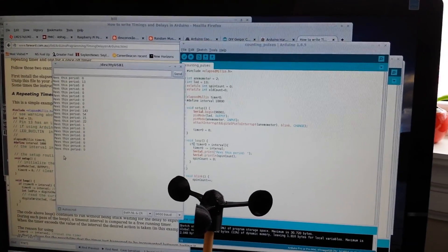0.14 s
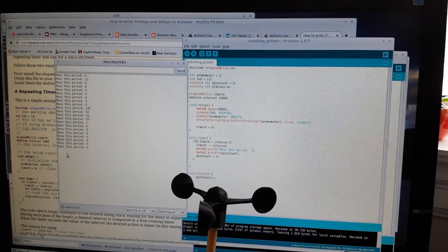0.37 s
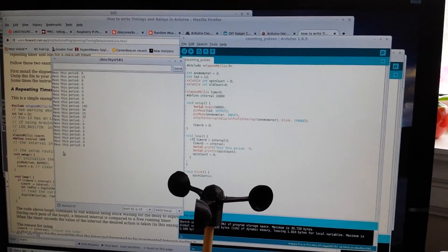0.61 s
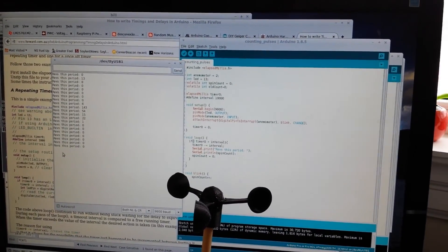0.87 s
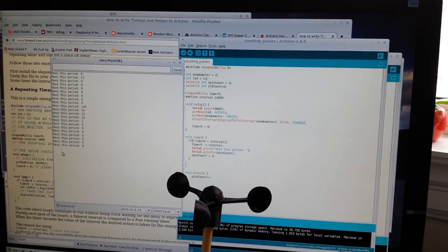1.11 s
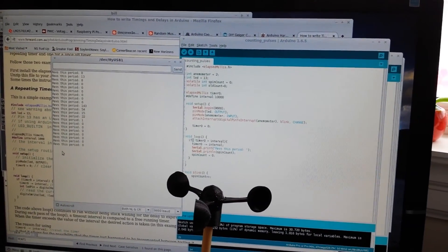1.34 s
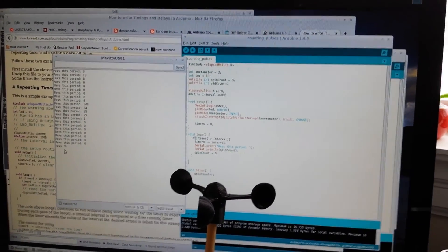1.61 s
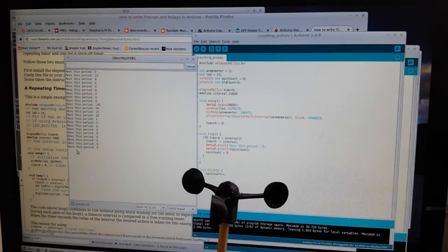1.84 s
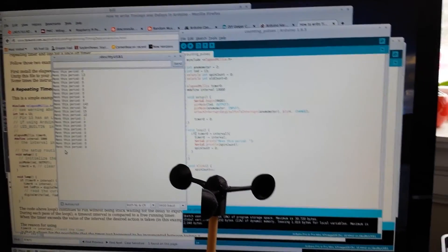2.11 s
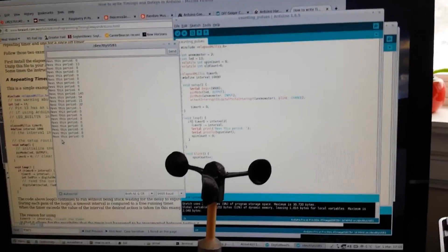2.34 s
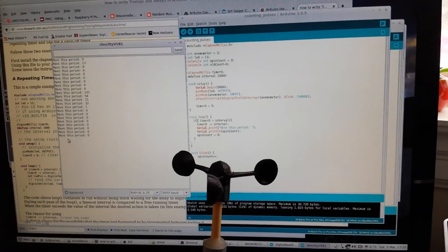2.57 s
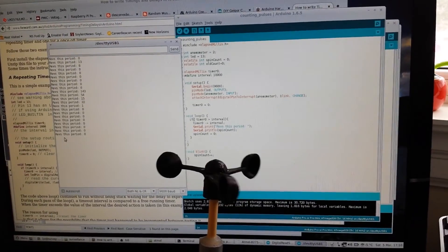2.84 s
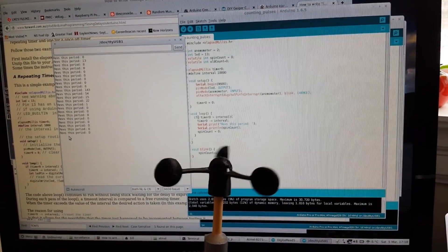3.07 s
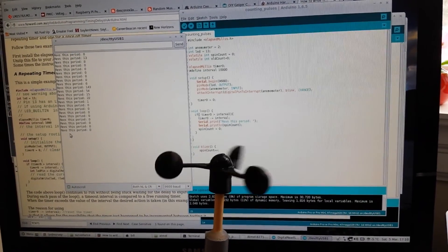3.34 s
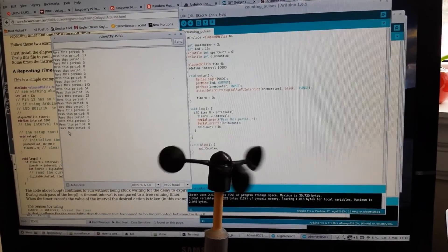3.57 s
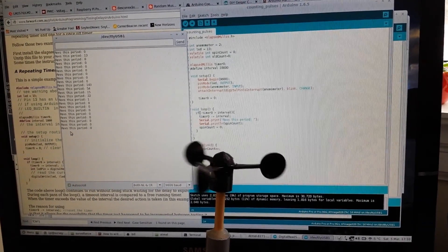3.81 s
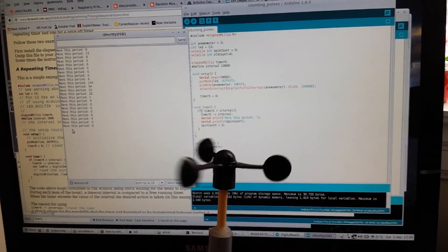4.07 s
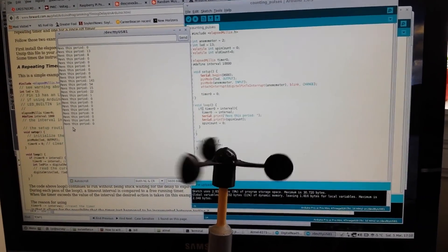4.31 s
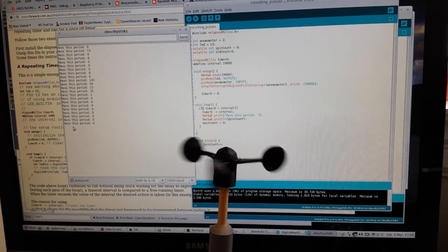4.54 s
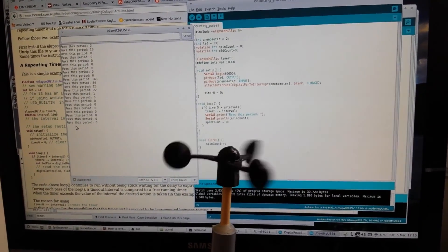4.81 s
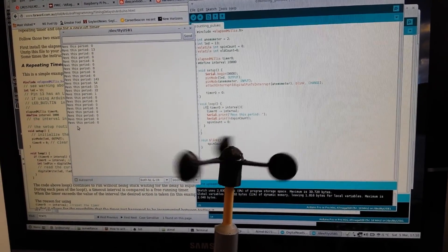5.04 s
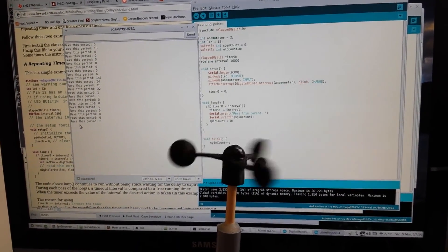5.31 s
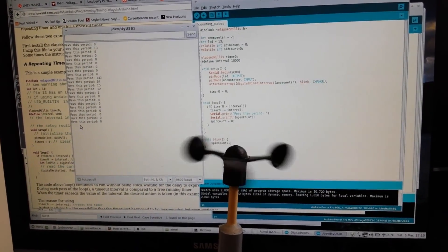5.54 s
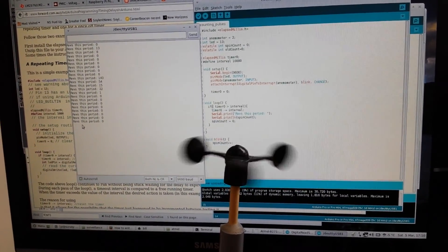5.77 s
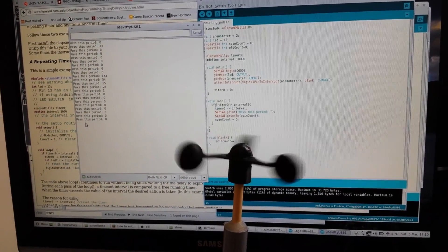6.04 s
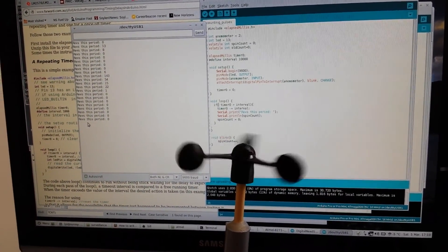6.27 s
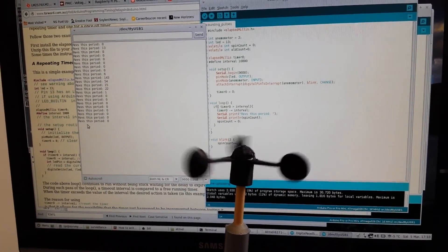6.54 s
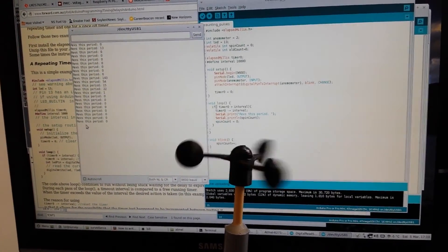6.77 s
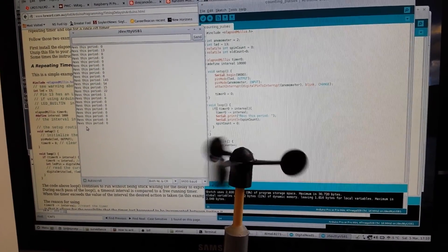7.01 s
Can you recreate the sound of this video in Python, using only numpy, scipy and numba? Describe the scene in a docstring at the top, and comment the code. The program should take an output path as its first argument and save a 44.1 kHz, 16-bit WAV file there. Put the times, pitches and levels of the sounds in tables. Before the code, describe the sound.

The first second is nearly silent: soft room hiss, settling at once, and tiny dull plastic taps around 0.1, 0.7 and 0.9 s. At 1.04 s a tight cluster of sharp switch clicks sounds, with another at about 1.28 s. A hair dryer close to the stereo microphones spins up, its whine gliding upward as air grows. Its jet sweeps across, giving a lumpy low rumble on the right near 1.45-1.6 s, then violent, distorted thumps on the left from 1.6 to 1.75 s. Until 2.5 s it runs at low speed, quieter, with a throbbing, breathy whistle. Around 2.5-2.8 s it steps up to high, pitch and rush rising; a faint handling rumble passes near 2.9 s. From 3 s to the end near 7 s the dense airy roar and buzzing motor whine stay steady, gaining a slightly more hollow, resonant colour after 5.9 s.

```python
"""Quiet room, a phone with two microphones, a hair dryer close by: it is switched on, spins up to low and is
then slid to high. Its jet, a lumpy rumble, sweeps over the right and then the left microphone on the way.
After that: rushing air (coloured noise), the whine of the shaft orders (sines at multiples of the shaft
rate), mains hum and one faint handling rumble. Switch snaps and faint taps are cracks that ring plastic;
a noise bed is the room."""
import sys
import numpy as np
from scipy import signal
from scipy.fft import rfft, irfft, next_fast_len
from scipy.io import wavfile
from numba import njit

SR = 44100
rng = np.random.default_rng(int(sys.argv[2]) if len(sys.argv) > 2 else 0)


def makeup_ratio(level_db):
    """Linear amplitude ratio for a level in decibels (20 dB per factor of ten)."""
    decades = np.asarray(level_db, float) / 20
    return 10 ** decades


def dump_mix(stems):
    """Bounce the given channels to the path in sys.argv[1] as a 16-bit WAV at rate SR."""
    frames = np.atleast_2d(stems).T  # one column per channel
    limited = np.clip(frames, -1, 1)  # hard clip at full scale
    pcm = np.round(limited * 32767).astype(np.int16)
    wavfile.write(sys.argv[1], SR, pcm)


N = 314874
T = np.arange(N) / SR
SIZE = next_fast_len(N)
F = np.maximum(np.arange(SIZE // 2 + 1) * SR / SIZE, 1)
LEFT_RIGHT = np.array([[.5], [-.5]])  # shares a left-minus-right value between the two microphones

# room tone spectrum, shape only: [f/Hz, level per Hz/dB]
ROOM_COLOUR = [(15, -38), (25, -4), (226, -2), (419, -13), (609, -8.5), (819, -16), (2000, -21.5),
               (4500, -23), (7000, -19), (9000, -22.5), (15300, -24)]
# faint room tones of fixed pitch and wavering level: [f/Hz, mean peak level/dB]
ROOM_LINES = [(120, -82), (240, -82), (1922, -92)]
# faint taps of the hand on plastic: [t/s, peak level before the room tail/dB, crack/dB, left minus right/dB]
TAPS = [(.084, -52, 8, .5), (.667, -51, -20, 3), (.918, -57, 12, 1)]
# ringing modes of the plastic: [f/Hz, level/dB, t60/s]
PLASTIC_MODES = [(600, -3, .03), (800, 0, .015), (1650, -15, .02), (2600, -20, .015)]
# switch snaps: [t/s, peak level before the room tail/dB, crack/dB, left minus right/dB]
SNAPS = [(1.04, -21, -2, 1), (1.0426, -26, 0, 1), (1.0457, -20, -2, 1), (1.0485, -26, -2, 1),
         (1.061, -34, 0, 1), (1.0648, -30, 0, 1), (1.0684, -29, -2, 1), (1.0735, -34, 0, 1),
         (1.279, -25, -4, 1)]
# ringing modes of the switch: [f/Hz, level/dB, t60/s]
SWITCH_MODES = [(850, -18, .03), (1300, -22, .015), (2300, -8, .022), (3100, -12, .007), (4200, -5, .005),
                (5200, -7, .006), (6400, 4, .008), (7200, -1, .006)]
# jet crossing the microphones; the last row is a faint low handling rumble:
# [arrival t/s, hold/s, rise/(dB/s), left level/dB, right level/dB]
RUMBLES = [(1.262, .025, 700, -38, -60), (1.3, .25, 240, -48, -56), (1.368, .03, 600, -60, -32),
           (1.445, .145, 500, -52, -23), (1.53, .04, 300, -38, -60), (1.59, .006, 1600, -16, -30),
           (1.61, .012, 1100, -5, -22), (1.634, .032, 1400, -4, -36), (1.68, .026, 1300, -8, -36),
           (1.72, .02, 500, -27, -44), (2.93, .05, 60, -46, -47)]
# spectrum of these rumbles, shape only: [f/Hz, level per Hz/dB]
RUMBLE_COLOUR = [(15, -32), (40, -5), (90, 6.5), (200, -0.5), (400, -12), (800, -28.5), (1500, -43),
                 (3000, -73)]
# shaft orders 1 upwards, one row each, at full speed and usual load: [left level/dB, right level/dB]
ORDERS = [(-50, -49), (-35, -46), (-31.5, -36), (-37, -35), (-43, -36), (-44, -52), (-47, -40), (-41, -34),
          (-39, -39), (-35, -35), (-37, -32), (-32, -35), (-39, -42), (-54, -52), (-38, -43), (-47, -47),
          (-46, -46), (-47, -47), (-52, -52), (-48, -48), (-43, -43), (-45, -45), (-42, -42)]
# the orders above those: [f/Hz, level/dB]
BRUSHES = [(5400, -45), (6800, -42), (8000, -45), (9500, -60), (10000, -55), (10240, -49), (10450, -59),
           (10700, -57), (12000, -52), (12800, -58), (13200, -60), (15000, -66)]
# orders that ring the casing as they glide through its resonances:
# [order, f/Hz, width/Hz, left level/dB, right level/dB]
GLIDES = [(12, 1070, 150, -55, -46), (8, 700, 110, -48, -50), (9, 905, 90, -48, -41),
          (3, 395, 60, -40, -48), (5, 690, 60, -38, -38), (7, 965, 80, -41, -38), (8, 1110, 60, -46, -40),
          (5, 933, 62, -37.5, -46.5)]
# phase by which the left microphone leads the right: [f/Hz, lead/rad]
LEAD = [(0, -1), (1030, 1.05), (1980, 1.5), (2240, 4), (2580, 4), (3360, 3), (4220, 2.5), (5770, 6.5),
        (8010, 8), (9040, 9.5), (12500, 15.5), (12700, 23), (14500, 14), (15000, 24)]
# rushing air as the dryer is moved: [t/s, level/dB, left minus right/dB]
AIR = [(1.09, -52.5, 5), (1.17, -47, 4.5), (1.28, -36, 3.5), (1.4, -29, 3), (1.56, -22.5, 4.5),
       (1.76, -27.5, 3.5), (1.84, -27, 3), (1.95, -29.5, 2.5), (2.14, -30.5, 1.5), (2.46, -31, -0.5),
       (2.56, -26.5, 0), (2.66, -23, 0), (2.8, -19, -0.5), (3.2, -18.5, -1), (4, -17.5, -0.1),
       (4.6, -18.5, -0.2), (5, -17.5, -1.5), (5.85, -18, -.5), (6.4, -17, -0.3), (7.14, -17.5, -0.5)]
# spectrum of the rushing air, shape only: [f/Hz, level per Hz/dB]
AIR_COLOUR = [(18, -63), (30, -40), (113, -14), (357, -12.5), (452, -8), (618, -8), (685, -5.5),
              (1190, -6.5), (1540, -1.5), (2330, -6), (2800, -8.5), (3190, -9), (3800, -6.5), (4480, -9),
              (5300, -5.5), (6980, -3), (10500, -21), (12300, -26.5), (15300, -37.5)]
# barrel resonances lifting the air: [f/Hz, width/Hz, lift/dB]
BARREL = [(763, 42, 4), (1473, 240, 3.5), (2780, 150, 6.5), (6190, 250, 5), (7040, 1070, 3.5)]
# share of the air noise common to both microphones: [f/Hz, share of power 0-1]
LIKENESS = [(40, 1), (130, 0.74), (300, 0.7), (700, 1), (1400, 1), (3000, 0.17), (6000, 0), (10000, 0.24),
            (15000, 0)]
# balance of the air across the spectrum: [f/Hz, left minus right/dB]
TILT = [(60, 19), (110, -1), (200, 7.5), (380, 5), (690, 4), (1280, 0), (2360, 0), (4350, 5.5), (8030, -4),
        (14800, -5)]
# change of colour when the fan is slow: [f/Hz, change at standstill/dB]
SLOW_COLOUR = [(150, 11), (300, 7), (1000, 19), (1450, -10), (2050, -2.5), (2900, -5), (4100, -10.5),
               (5800, -4), (8000, -10.5), (9500, -6), (12000, 3.5)]
# colour while held to the left: [f/Hz, change per dB of left-minus-right balance/dB]
SIDEWAYS = [(200, 0.74), (1000, -2.4), (2500, 0.37), (4000, 0.3), (11000, 0.66)]
# colour after the nozzle turns towards the phone: [f/Hz, change/dB]
TURNED = [(200, 1.5), (1000, 0), (2500, 0.2), (4000, 1.1), (11000, 0.5)]
# inlet and nozzle resonances:
# [f/Hz, width/Hz, level over the flow/dB, more at low setting/dB, more when turned/dB, flutter/dB]
TONES = [(530, 94, -1, 4.5, 1.5, 2), (2093, 197, -1, -3, 11, 4.5)]

ON_S = 1.04
HIGH_S, HIGH_HZ, STEP_UP_S = 2.52, 227.6, .2  # slid to high; final shaft rate; time of the step


def curve(rows):
    """Columns of a table of (t/s, value, ..) at every sample."""
    s, *columns = np.transpose(rows)
    return np.array([np.interp(T, s, c) for c in columns])


def over(points, hz=F):
    """Values of (f/Hz, value) points, joined on a log-frequency axis."""
    at, value = np.transpose(points)
    return np.interp(np.log(hz), np.log(np.maximum(at, 1)), value)


def noise():
    """Spectrum of white noise."""
    return rfft(rng.standard_normal(SIZE))


def walk(rate):
    """Random levels joined smoothly, rate a second."""
    count = int(T[-1] * rate) + 2
    return np.interp(T * rate, np.arange(count), rng.standard_normal(count))


def sound(spectrum):
    """Samples of a spectrum, cut to the length of the scene."""
    return irfft(spectrum, SIZE)[:, :N]


def room():
    """Quiet room tone and faint tones of fixed pitch and wavering level; it settles at first, its bass wavers."""
    room_db = -68  # rms of the tone from 1 s on
    settle_bass_db, settle_hiss_db, settle_s = 8, 10.5, .078
    common = noise()
    tone = np.array([0.51 * common + noise(), 0.64 * common + noise()]) * makeup_ratio(over(ROOM_COLOUR))
    bass_share = 1 / (1 + (F / 900) ** 2)
    settle = np.exp(-T / settle_s)
    bass = sound(tone * bass_share) * makeup_ratio(settle_bass_db * settle + 2.2 * walk(16.5))
    hiss = sound(tone * (1 - bass_share)) * makeup_ratio(settle_hiss_db * settle)
    bed = bass + hiss
    lines = sum(np.sin(2 * np.pi * hz * T) * makeup_ratio(db + 3 * walk(10)) for hz, db in ROOM_LINES)
    return bed / np.std(bed[:, SR:]) * makeup_ratio(room_db) + lines


def ring(events, modes, tail_db, tail_s):
    """Each blow is a broad crack and rings the modes with its own weights; a short room tail follows."""
    out, t = np.zeros((2, N + SR)), T[:SR // 4]
    hz, mode_db, t60 = np.array(modes).T[:, :, None]
    crack_band = signal.butter(2, [1200, 10000], "bandpass", fs=SR, output="sos")
    for s, db, crack_db, pan_db in events:
        # levels and pitches scatter from blow to blow and between the microphones
        chance = rng.standard_normal((2, 2, len(modes), 1))
        decay = makeup_ratio(mode_db + 2.7 * chance[0] - 60 * t / t60)
        blow = np.sum(decay * np.sin(2 * np.pi * hz * (1 + 0.05 * chance[1]) * t), axis=1)
        crack = signal.sosfilt(crack_band, rng.standard_normal((2, len(t))))
        blow = blow + crack * makeup_ratio(crack_db - 60 * t / .016)
        blow = blow * (1 - np.exp(-t / .0003))  # contact builds up
        blow = blow / np.max(np.abs(blow))
        tail = rng.standard_normal((2, len(t))) * makeup_ratio(tail_db - 60 * t / tail_s)
        blow = blow + signal.fftconvolve(blow, tail, axes=1)[:, :len(t)]
        first = int(s * SR)
        out[:, first:first + len(t)] += blow * makeup_ratio(db + LEFT_RIGHT * pan_db)
    return out[:, :N]


def taps():
    """The hand taps plastic, which rings for a few hundredths of a second."""
    return ring(TAPS, PLASTIC_MODES, -34, .15)


def switch():
    """The switch snaps: a cluster of sharp cracks exciting its small, quickly damped parts."""
    return ring(SNAPS, SWITCH_MODES, -33, .2)


def jet_and_handling():
    """Jet eddies buffet each port on its own: lumpy low rumble, sharp crests; a faint handling rumble is alike."""
    fall_share = .55  # it leaves more slowly than it comes
    # a full blast turns brighter as it builds
    bright_hz, bright_db, full_db, builds_s = 400, 16, -7, .03
    power = 0
    for s, hold_s, rise_db, *ports_db in RUMBLES:
        away_s = np.maximum(s - T, 0) + fall_share * np.maximum(T - s - hold_s, 0)
        power = power + makeup_ratio(np.array(ports_db)[:, None] - rise_db * away_s) ** 2
    spectra = np.array([noise(), noise()]) * makeup_ratio(over(RUMBLE_COLOUR))
    spectra = spectra / np.std(irfft(spectra, SIZE))
    high = sound(spectra / (1 + (bright_hz / F) ** 2))
    earlier = np.sqrt(np.roll(power, int(builds_s * SR), axis=1))
    fullness = np.minimum(earlier / makeup_ratio(full_db), 1)
    rumble = sound(spectra) + high * makeup_ratio(bright_db) * fullness
    rumble = rumble * makeup_ratio(2.0 * np.array([walk(70), walk(70)]))  # lumps
    crests = 1 + .15 * np.abs(rumble)
    return rumble * crests * np.sqrt(power)


def shaft():
    """Turns per second: the shaft closes in on the low setting, then steps to high and creeps as it warms."""
    kick_hz, low_hz, spin_up_s = 12, 199.5, .44
    creep_hz, creep_s = 3.8, 1.2
    low = low_hz - (low_hz - kick_hz) * np.exp(-np.clip(T - ON_S, 0, HIGH_S - ON_S) / spin_up_s)
    since = np.maximum(T - HIGH_S, 0)
    step = (HIGH_HZ - creep_hz - low[-1]) * (1 - np.exp(-since / STEP_UP_S))
    return low + step + creep_hz * (1 - np.exp(-since / creep_s))


def motor(load_db):
    """Clean multiples of the shaft rate, wavering as the hand moves in the room; casing rings and mains hum."""
    hum_hz = 120
    # the lowest orders swell once the speed has settled
    swell_s, swell_takes_s, swell_db, swell_orders = 3.05, .15, 13, 5
    shake_db = 200  # loss of order 1 at standstill, divided by order: shaking the casing needs speed
    hz = shaft()
    turn = np.exp(2j * np.pi * np.cumsum(hz) / SR)
    orders, z = np.zeros((2, N)), np.ones(N, complex)
    unsettled_db = swell_db * np.clip((swell_s - T) / swell_takes_s + 1, 0, 1)
    for k in range(1, 67):
        z = z * turn
        scatter, start = rng.standard_normal(2), 2 * np.pi * rng.random()
        db = ORDERS[k - 1] if k <= len(ORDERS) else over(BRUSHES, k * hz[-1]) + 2.2 * scatter
        lead = np.interp(k * hz[-1], *np.transpose(LEAD))
        loss_db = shake_db / k * (1 - hz / HIGH_HZ) + unsettled_db * (k <= swell_orders)
        for ear in range(2):
            tone = (z * np.exp(1j * (start - ear * lead))).real
            orders[ear] += tone * makeup_ratio(db[ear] - loss_db + 1.5 * walk(1.5))
    whine = 0
    for k, centre, width, *db in GLIDES:
        resonance = 1 / (1 + (2 * (k * hz - centre) / width) ** 6)
        whine = whine + (turn ** k).imag * resonance * makeup_ratio(np.array(db)[:, None] + 3.4 * walk(45))
    hum = np.sin(2 * np.pi * hum_hz * T) * makeup_ratio(-48.0 + 0.93 * load_db + 2.0 * walk(14))
    # sqrt(2): the levels are rms
    return np.sqrt(2) * (T > ON_S) * (orders * makeup_ratio(1.6 * load_db) + hum + whine)


def air(level_db, pan_db):
    """Turbulent flow through the barrel, heard directly (alike, delayed between ports) and from the room."""
    turn_s, turn_takes_s = 5.85, .15  # the nozzle turns towards the phone
    throb_hz, throb_crest_s, throb_depth_db = 9.3, 2.145, 6  # resonances throb at the low setting
    whistle_hz, whistle_db, waver_hz = 528, -6, 10  # the inlet whistles at the low setting
    barrel_db = sum(db / (1 + (2 * (F - hz) / width) ** 2) for hz, width, db in BARREL)
    alike = np.clip(over(LIKENESS), 0, 1)
    direct = noise() * np.exp(1j * LEFT_RIGHT * np.interp(F, *np.transpose(LEAD)))
    diffuse = np.array([noise(), noise()])
    flow = np.sqrt(alike) * direct + np.sqrt(1 - alike) * diffuse
    flow = flow * makeup_ratio(over(AIR_COLOUR) + barrel_db + LEFT_RIGHT * over(TILT))
    flow = flow / np.std(irfft(flow * ((F > 4500) & (F < 8500)), SIZE))  # unit rms in this band

    slowness = 1 - shaft() / HIGH_HZ
    turned = np.clip((T - turn_s) / turn_takes_s, 0, 1)
    low_setting = np.clip((HIGH_S - T) / STEP_UP_S + .5, 0, 1)
    out, gust_db = 0, .3 * walk(6)
    for centre in np.arange(5, 14.6, .5):  # half-octave bands, log2 Hz
        band = np.cos(np.pi * np.clip(np.log2(F) - centre, -.5, .5)) ** 2
        hz = 2 ** centre
        db = slowness * over(SLOW_COLOUR, hz) + pan_db * over(SIDEWAYS, hz) + turned * over(TURNED, hz)
        out = out + sound(flow * band) * makeup_ratio(db + gust_db + .45 * walk(9))
    throb_db = throb_depth_db * np.cos(2 * np.pi * throb_hz * (T - throb_crest_s))
    for hz, width, db, low_db, turned_db, flutter_db in TONES:
        # the resonance lifts the flow noise near its pitch and flutters
        now_db = db + (low_db + throb_db) * low_setting + turned_db * turned
        resonance = 1 / (1 + (2 * (F - hz) / width) ** 4)
        out = out + sound(flow * resonance) * makeup_ratio(now_db + flutter_db * walk(12))
    whistle = np.sin(2 * np.pi * np.cumsum(whistle_hz + waver_hz * walk(25)) / SR)
    whistle = whistle * low_setting * (1 - slowness) ** 4 * makeup_ratio(whistle_db + throb_db + 1.2 * walk(8))
    return (out + whistle) * makeup_ratio(level_db)


def scene():
    """Room, taps, switch, jet, handling and the dryer as it is moved about the microphones."""
    level_db, pan_db = curve(AIR)
    start = np.clip((T - ON_S) / 0.032, 0, 1)
    load_db = level_db - np.median(level_db[N // 2:])
    dryer = start * air(level_db, pan_db) + motor(load_db)
    dryer = dryer * makeup_ratio(LEFT_RIGHT * pan_db)
    return room() + taps() + switch() + jet_and_handling() + dryer


@njit
def follow(x, attack, release):
    """Peak follower, quick up and slow down."""
    out, e = np.empty(len(x)), 0.
    for i in range(len(x)):
        e += (x[i] - e) * (attack if x[i] > e else release)
        out[i] = e
    return out


def top_cut(x):
    """Nothing passes above the cut-off."""
    return signal.sosfilt(signal.butter(12, 15410, fs=SR, output="sos"), x)


def record(dry):
    """One look-ahead limiter for both microphones ducks everything while the jet hits; then hard clipping."""
    ahead_s, attack_s, release_s, ceiling_db = .018, .005, .035, -5.0
    loudest = np.max(np.abs(dry), axis=0)
    peak = follow(np.roll(loudest, -int(ahead_s * SR)), 1 / (attack_s * SR), 1 / (release_s * SR))
    held = dry * np.minimum(1, makeup_ratio(ceiling_db) / (peak + 1e-9))
    mix = np.clip(held, -.96, .96)
    return top_cut(mix)


dry = scene()
out = record(dry)
dump_mix(out)
```